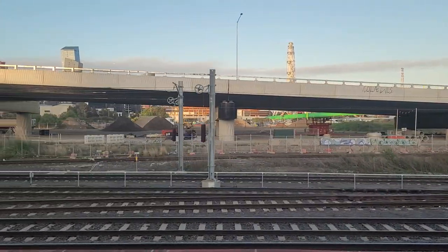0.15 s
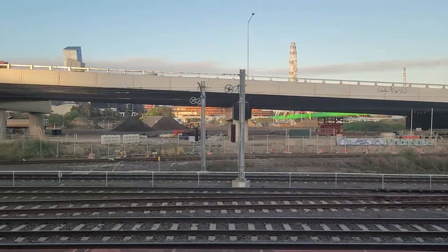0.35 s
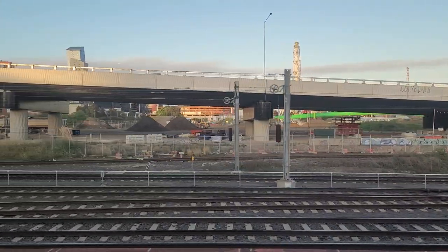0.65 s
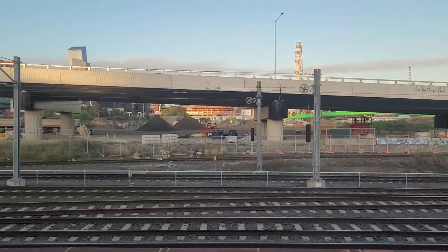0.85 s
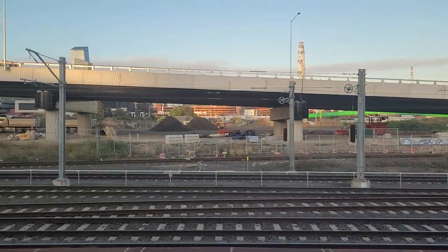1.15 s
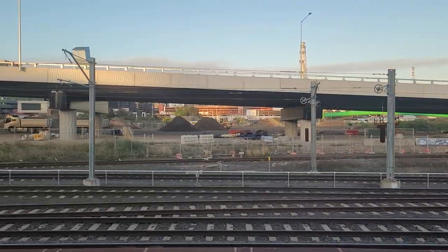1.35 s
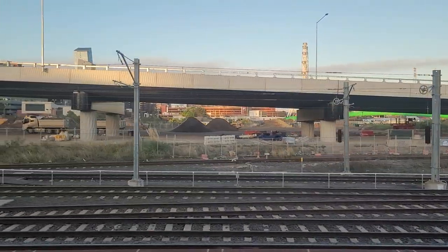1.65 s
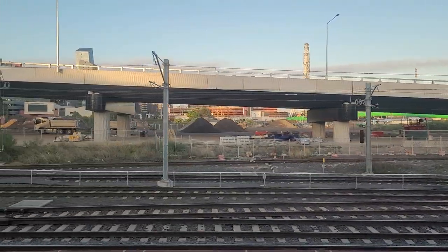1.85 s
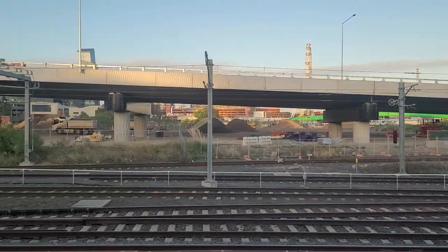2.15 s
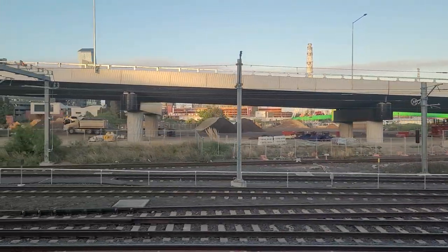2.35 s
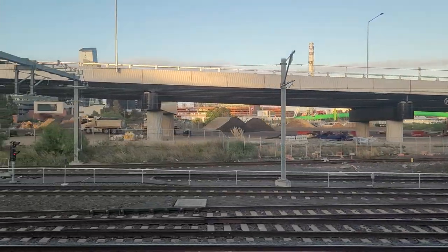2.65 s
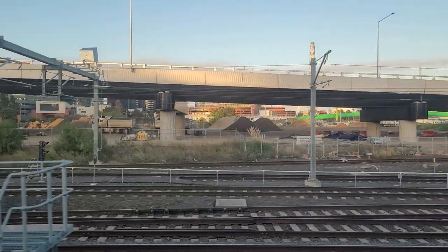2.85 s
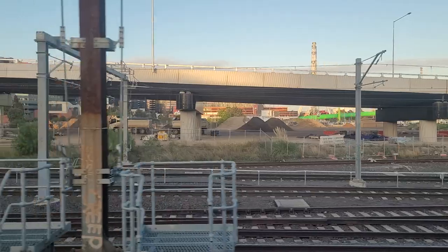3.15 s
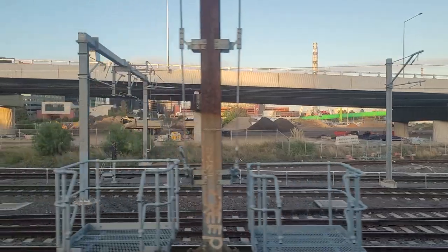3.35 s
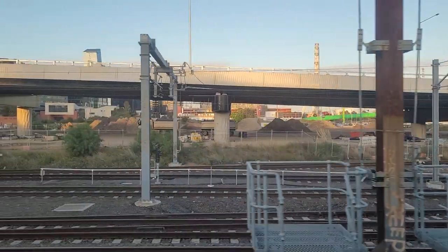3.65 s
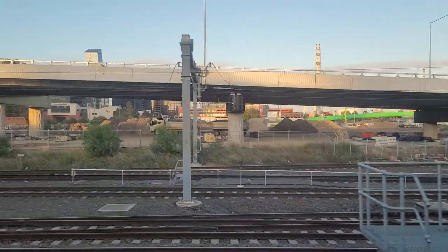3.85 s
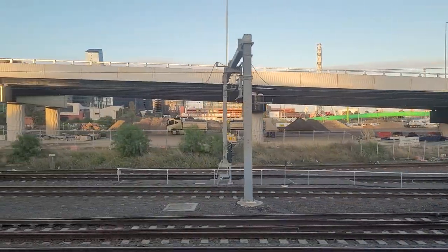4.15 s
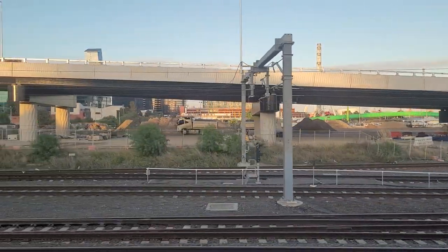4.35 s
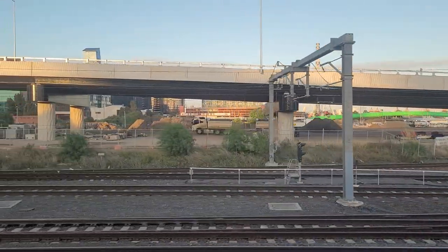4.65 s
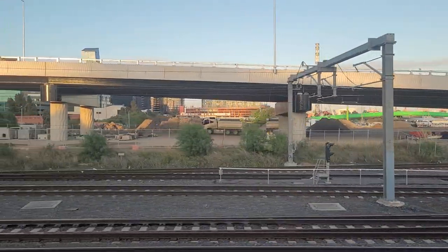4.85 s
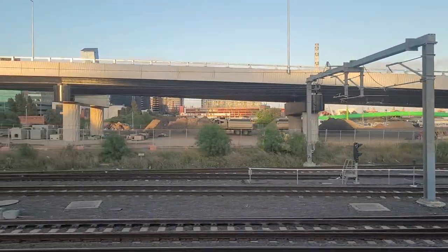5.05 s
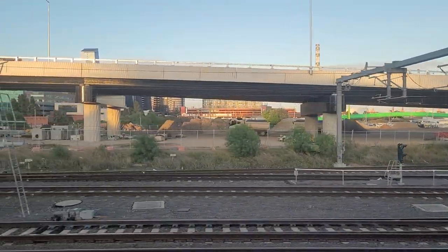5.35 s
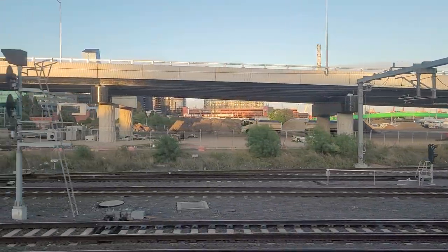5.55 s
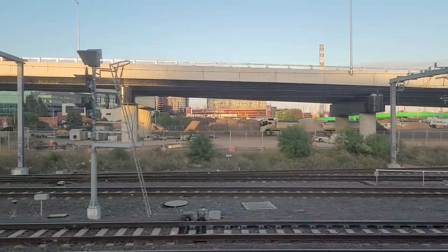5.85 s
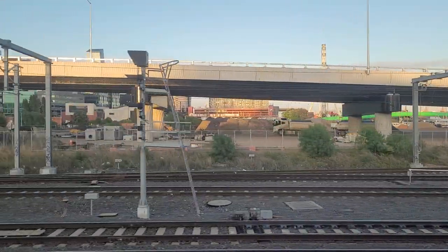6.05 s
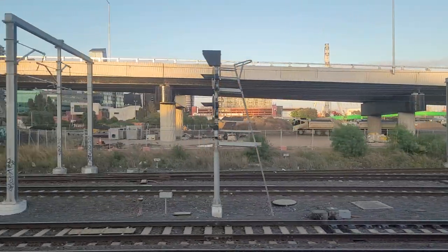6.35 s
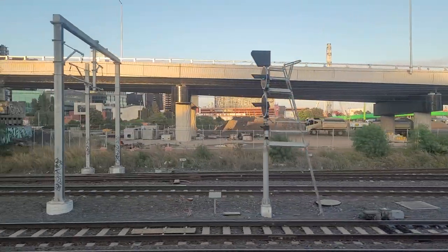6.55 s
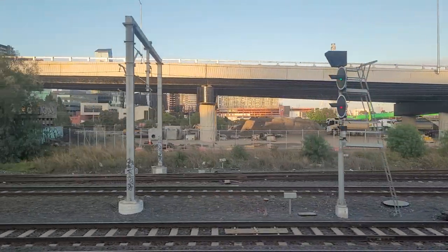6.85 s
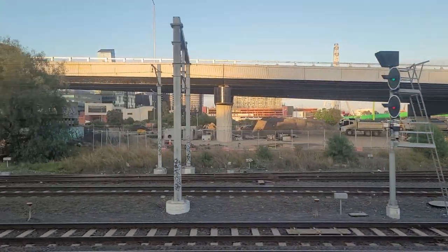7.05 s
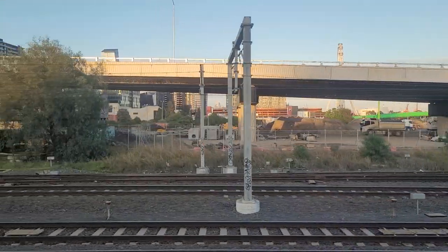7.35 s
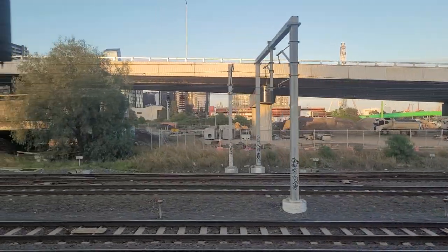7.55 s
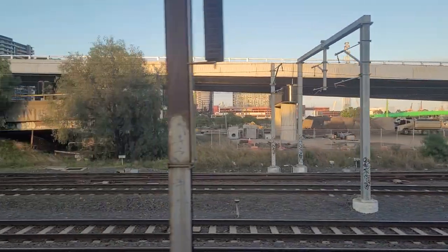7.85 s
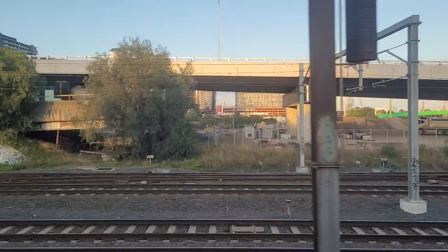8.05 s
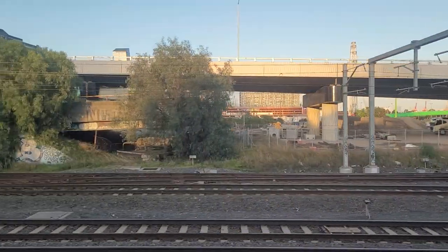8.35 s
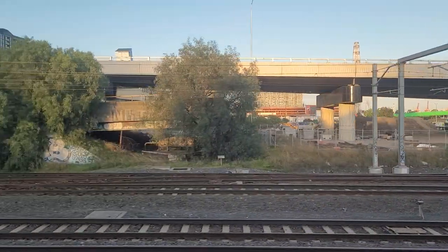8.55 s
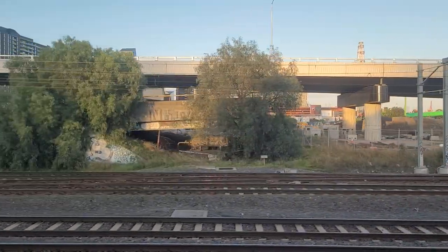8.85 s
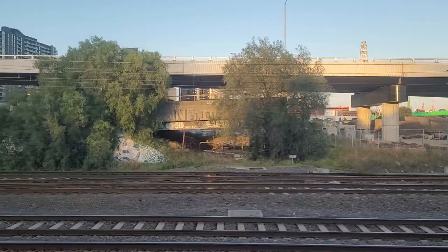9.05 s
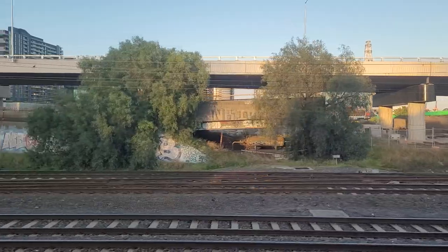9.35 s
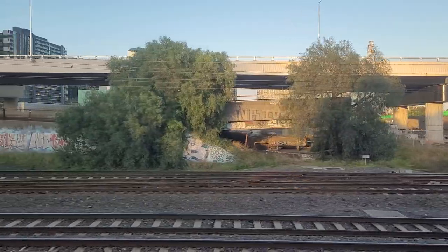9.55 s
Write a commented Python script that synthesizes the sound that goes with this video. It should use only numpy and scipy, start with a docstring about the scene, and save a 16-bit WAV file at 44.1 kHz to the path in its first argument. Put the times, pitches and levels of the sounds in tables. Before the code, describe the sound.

Steady train carriage rumble with faint whine and small ticks; late on, the track booms in surges and a catch snaps loudly to the left.

```python
"""Inside an electric train carriage rolling at an even speed: wheel and rail roughness excites the car body,
heard as a low drone and a roar under ventilation noise and a faint whine. The wheels thump over joints, and
a stretch of track, likely a short bridge, booms for about two seconds as its modes are driven in surges.
Fittings rebound in short ticks, a metal part clinks, a catch clacks on the left, and fabric swishes softly:
each is an impulse, decaying modes or shaped noise, and the hard contacts are followed by the cabin's echo."""
import sys
import numpy as np
from scipy import signal
from scipy.fft import rfft, irfft, next_fast_len
from scipy.io import wavfile
from scipy.ndimage import uniform_filter1d, map_coordinates

SR = 44100
rng = np.random.default_rng(int(sys.argv[2]) if len(sys.argv) > 2 else 0)


def materialize(psi):
    """Save the field psi as 16-bit PCM at rate SR to the path in sys.argv[1].

    A 1-D psi becomes a single channel; in a 2-D psi each row is a channel.
    """
    bounded = np.clip(np.atleast_2d(psi).T, -1, 1)
    quanta = np.round(bounded * 32767).astype(np.int16)
    wavfile.write(sys.argv[1], SR, quanta)


N = 427769  # length [samples]

# Roughness of the rails; its departure from the mean is used: (time [s], level [dB])
RAIL_ROUGHNESS = [(0.0, -54), (0.54, -53.5), (0.72, -51.5), (1.1, -52.3), (1.32, -50.5), (1.55, -51),
                  (3.3, -51.5), (3.9, -52), (6.7, -52), (7.3, -50.5), (8.05, -52), (8.73, -51.3),
                  (9.32, -53.5), (9.7, -52.5)]
# Low resonances of the car body: (frequency [Hz], width [Hz], relative level [dB])
FLOOR_MODES = [(30, 8, -9.5), (46.6, 12, -1), (63.8, 13, -0.5), (83.6, 5.8, -3), (109.4, 25.3, 1),
               (128.1, 17, -1), (166.5, 18, -2), (196.4, 70, -8.5)]
# Wall and window resonances: (frequency [Hz], width [Hz], relative level [dB])
PANEL_MODES = [(228.3, 18, -4.5), (260.3, 54, 0.5), (280, 61, -3), (319.4, 32, 0.5), (348.2, 28, -1.5),
               (400.5, 41, -5.5), (421, 48, -5), (444, 74, -18)]
# Spectrum of the rail roar: (frequency [Hz], relative density [dB per Hz])
ROAR_SPECTRUM = [(330, -40), (470, 2), (540, 0), (640, 0), (730, -2), (850, -7), (1000, -16.5),
                 (1300, -23.5), (2500, -65.5)]
# Each pair: level on average rail [dB], growth [dB per dB of roughness]
BOOM_DB, BOOM_GROWS = -31, 0.55  # floor
DRONE_DB, DRONE_GROWS = -34.5, 0.9  # panels
ROAR_DB, ROAR_GROWS = -42.5, 0.77  # rails, through the windows
AIR_DB, AIR_GROWS = -49, 1.1  # rush of air

# Bridge girders, through the floor: (frequency [Hz], width [Hz], relative level [dB])
GIRDER_MODES = [(66.2, 22, 2), (82, 47, -8.5), (103, 31, 0.5), (129.8, 13, 3.5), (166.8, 20, 1)]
# Bridge deck: (frequency [Hz], width [Hz], relative level [dB])
DECK_MODES = [(220, 52, -1), (249.2, 18, 1.5), (284, 28, 2), (323.7, 47, -2)]
# Upper resonances of the bridge: (frequency [Hz], width [Hz], relative level [dB])
UPPER_MODES = [(366, 37, 2), (367, 26, -9.5), (415, 66, 2), (440, 40, 1), (554, 109, -8.5),
               (1750, 400, -28.5)]
# Surges of the bridge: (time [s], girder relative level [dB], deck relative level [dB])
BRIDGE_SURGES = [(7.04, -25, -24), (7.11, -27.5, -32.5), (7.2, -23.5, -25), (7.27, -30, -24),
                 (7.41, -25.5, -27), (7.55, -25, -26), (7.65, -23.5, -21.5), (7.76, -24.5, -25),
                 (7.89, -22.5, -27), (7.99, -21.5, -22.5), (8.08, -20.5, -22.5), (8.18, -24.5, -24.5),
                 (8.37, -25, -26), (8.48, -19, -23), (8.6, -27.5, -29.5), (8.69, -24, -27.5),
                 (8.78, -26.5, -23), (8.92, -21, -23), (9.01, -26, -28), (9.09, -29, -27.5),
                 (9.16, -31, -22.5), (9.27, -40, -37.5)]
ENTER_S, LEAVE_S = 6.98, 9.33  # the car is on the bridge between these times
ENTER_RISE_S, LEAVE_FALL_S = 0.18, 0.052  # the bogie rolls on and off
GIRDER_DB = -0.44  # added to the girder surges
DECK_DB, DECK_ENDS_DB = -1.26, 1  # added to the deck surges: in mid-span, and the change at the ends
UPPER_DB, UPPER_ENDS_DB = -6.5, -7.5  # the same for the upper modes, which follow the deck
SPAN_ROAR_DB, SPAN_ROAR_FADE_DB = -43, -12.5  # extra roar: level at entry, and the change by the exit
STEADY_S = .08  # averaging time that evens out the girder and deck noise

# Wheels over joints:
# (time [s], knock relative level [dB], spectral tilt [dB per octave], floor push level [dB])
JOINT_BLOWS = [(0.722, -29.5, 2, -42), (0.756, -20, 0, -38), (0.794, -27, -6.5, -27),
               (0.831, -25.5, -8.5, -26), (1.655, -23, -9, -16.5), (1.705, -26.5, -14, -30),
               (1.958, -25.5, -4, -13.5), (3.182, -31.5, 4.5, -20), (3.515, -26, -13.5, -24.5),
               (3.812, -40, 7, -17.5), (6.910, -18.5, 1.5, -22), (6.936, -25.5, -1.5, -14),
               (9.120, -27, -2.5, -34), (9.56, -30, -2, -35)]
# Spectrum of a knock: (frequency [Hz], relative density [dB per Hz])
KNOCK_SPECTRUM = [(30, -26.5), (70, 2.5), (120, -2.5), (200, 0.5), (300, 7.5), (440, -4.5), (650, -10.5),
                  (950, -20), (1500, -36), (4000, -52), (10000, -76), (15000, -81.5)]
KNOCK_T60_S = 0.23  # every knock dies at the same speed

# Contacts of a hard catch as it snaps shut and settles: (time [s], level [dB])
CATCH_CONTACTS = [(9.0570, -15.5), (9.0775, -29.5), (9.129, -30)]
# Resonances of the catch: (frequency [Hz], width [Hz], relative level [dB])
CATCH_MODES = [(2080, 280, -2.5), (2700, 530, 1), (3320, 560, -0.5), (4400, 380, 1), (4900, 600, -5),
               (5960, 600, -5), (6900, 650, -10), (7850, 450, -9), (9200, 600, -14), (10100, 550, -16),
               (11400, 750, -19), (12350, 490, -15)]
# Modes of the panel that holds the catch: (frequency [Hz], relative level [dB])
CATCH_PANEL_MODES = [(1820, -2.5), (1980, -1), (2360, -1), (2850, -3.5), (4450, -7), (4910, -4.5)]
# Spectrum of the clack's echo: (frequency [Hz], relative density [dB per Hz])
CLACK_ECHO_SPECTRUM = [(1000, -27), (1800, 5.5), (2800, -0.5), (3800, -2.5), (4800, -2.5), (6500, -4),
                       (7700, -5.5), (9800, -4.5), (12400, -11.5), (14000, -23)]
CATCH_PANEL_T60_S = 0.097

# Cabin fittings:
# (time [s], relative level [dB], centre [Hz], width [octaves], echo level re unit-energy contact [dB])
FITTING_TICKS = [(0.634, -50.5, 3800, 0.8, 5), (0.691, -51.5, 4020, 0.89, 1.5), (2.174, -51, 4500, 1.1, -1),
                 (2.3228, -41, 3500, 0.71, -0.5), (3.548, -54.5, 5500, 0.55, 3),
                 (4.701, -47, 3500, 0.55, -1), (6.907, -60, 9400, .5, 9), (7.313, -54.5, 6000, 0.71, -0.5),
                 (7.384, -58, 6470, 0.55, 1.5), (7.824, -51, 7240, 0.62, -8)]
# Spectrum of a hard small contact: (frequency [Hz], relative density [dB per Hz])
SNAP_SPECTRUM = [(500, -32.5), (1450, -16), (1900, 2), (2400, 4), (3000, -1), (3800, -7), (4600, -4.5),
                 (5500, -6), (7700, -7.5), (12000, -8.5), (15000, -23.5)]
REBOUND_S, REBOUND_LOSS_DB = 0.012, 11.5  # a fitting chatters: time between contacts, loss at each
ECHO_DB, RING_DB = 2, -7  # echo of the faint ticks; energy of a tick's ring about its crack
FAINT_PER_S, FAINT_DB, FAINT_SPREAD_DB = .6, -63, 3  # rate, relative level and its spread either way
FAINT_HZ, FAINT_OCTAVES = 6000, 0.61  # middle of the centres, width of each

# Modes of a small metal part: (frequency [Hz], relative level [dB])
METAL_MODES = [(4820, -2), (5400, 2.5), (7120, -1.5), (7720, 0.5)]
METAL_T60_S, CLINK_S, CLINK_DB = .022, 7.9505, -46  # decay, time, relative level

# Fabric strokes:
# (centre time [s], swell deviation [s], level [dB], centre [Hz], width [octaves], left-right level [dB])
FABRIC_STROKES = [(1.461, 0.034, -59.5, 5400, 1, 1.5), (1.917, 0.086, -59.5, 9000, 1.7, 2),
                  (2.168, 0.11, -64, 5500, 1.9, 0.5), (2.821, 0.14, -65.5, 10750, 0.48, -10),
                  (5.354, 0.16, -71, 10700, .5, -1), (8.79, 0.063, -63, 6000, 1.8, 5.5)]
# Spectrum of sliding cloth: (frequency [Hz], relative density [dB per Hz])
CLOTH_SPECTRUM = [(1200, -32.5), (2500, 8), (4000, 4.5), (6500, 0), (9000, -2), (11400, -3), (11900, -9.5),
                  (15700, -8.5)]

# Lasting tones of the traction electronics: (frequency [Hz], mean level [dB])
WHINE_TONES = [(3030, -82), (2930, -86.5)]
# Passing hums: of gears and motors, and at 9.35 s the bridge deck ringing on:
# (centre time [s], swell deviation [s], frequency [Hz], peak level [dB])
PASSING_HUMS = [(1.59, 0.34, 459, -47), (2.688, 0.17, 467, -45), (4.99, 0.28, 490, -47),
                (5.311, 0.97, 715, -58), (5.803, 0.83, 434, -57.5), (6.595, 0.43, 440, -53),
                (9.352, 0.23, 207.2, -40.5)]

# Spectrum of the ventilation: (frequency [Hz], relative density [dB per Hz])
AIR_SPECTRUM = [(600, -34), (950, 1), (1300, 0.5), (1700, -4.5), (2300, -11), (3000, -13.5), (3400, -17),
                (4300, -19), (5200, -24), (7600, -30.5), (8700, -29.5), (10000, -30.5), (10700, -34),
                (15700, -32.5)]
WANDER_DB, AIR_WANDER_DB = 1.5, 1  # rms wander of narrow bands: in general, and in the air

# Likeness of the two ears in a diffuse field: (frequency [Hz], correlation [-1 to 1])
EAR_CORRELATION = [(40, .975), (180, .94), (300, .8), (430, .62), (490, .35), (720, .33), (930, -.3),
                   (1500, -.15), (2500, -.05), (6000, 0)]
# Left-right level difference of the field: (frequency [Hz], difference [dB])
EAR_LEVEL_DIFFERENCE = [(30, -2.5), (85, 0.5), (145, -2.5), (220, 0), (400, -3.5), (750, -1), (980, 2),
                        (1150, -6.5), (1600, -1.5), (2050, 0.5), (2800, 0.5), (4200, 2.5), (7000, -2.5),
                        (13000, 1.5)]
# Phase by which the left ear leads: (frequency [Hz], phase [rad])
EAR_PHASE_LEAD = [(45, .39), (110, .21), (200, .06), (430, .06), (510, .45), (600, 0), (780, .5),
                  (950, -.55), (1300, 0)]
# Reverberation of the cabin: (frequency [Hz], decay time T60 [s])
CABIN_T60 = [(200, .4), (2500, 0.38), (7000, 0.39), (13000, 0.2)]
# Treble shelf of the microphone: (frequency [Hz], gain [dB])
MIC_SHELF = [(7700, 0), (8300, -11)]
TOP_HZ = 15720  # band limit


def rolling(flutter_db=0.63, sway_db=-0.5):
    """Structure-borne sound: rail roughness shakes floor and panels; rail roar leaks through the windows."""
    rough = roughness()
    shake = flutter_db * wobble(15)
    boom_gain = amp(BOOM_DB + BOOM_GROWS * rough + sway_db * wobble(3.5))
    boom = boom_gain * field(resonances(FLOOR_MODES))
    drone = amp(DRONE_DB + DRONE_GROWS * rough + shake) * wandering(field(resonances(PANEL_MODES)))
    roar = amp(ROAR_DB + ROAR_GROWS * rough + shake) * wandering(field(colour(ROAR_SPECTRUM)))
    return boom + drone + roar


def roughness():
    """Roughness excitation: the rails under the car, in dB about their average."""
    db, = curves(RAIL_ROUGHNESS)
    return db - db.mean()


def bridge(judder_db=1):
    """Forced vibration: wheels drive girders and deck in juddering surges; upper modes peak in mid-span."""
    t = np.arange(N) / SR
    rolled_on = (t - ENTER_S) / ENTER_RISE_S
    still_on = (LEAVE_S - t) / LEAVE_FALL_S
    on_span = np.clip(np.minimum(rolled_on, still_on), 0, 1)
    crossed = np.clip((t - ENTER_S) / (LEAVE_S - ENTER_S), 0, 1)
    off_centre = (2 * crossed - 1) ** 2  # 0 in mid-span, 1 at the ends
    girder_db, deck_db = curves(BRIDGE_SURGES)
    girders = amp(girder_db + GIRDER_DB) * levelled(field(resonances(GIRDER_MODES)))
    deck_gain = amp(deck_db + DECK_DB + DECK_ENDS_DB * off_centre)
    deck = deck_gain * levelled(field(resonances(DECK_MODES)))
    upper_gain = amp(deck_db + UPPER_DB + UPPER_ENDS_DB * off_centre)
    upper = upper_gain * field(resonances(UPPER_MODES))
    roar_gain = amp(SPAN_ROAR_DB + SPAN_ROAR_FADE_DB * crossed)
    roar = roar_gain * wandering(field(colour(ROAR_SPECTRUM)))
    return on_span * amp(judder_db * wobble(18)) * (girders + deck + upper + roar)


def joints(rise=0.0065, knock_db=4, floor_hz=126, floor_t60=0.19):
    """Impact response: blows softened by the suspension swing the floor and ring crowded body modes."""
    out, t = np.zeros((2, N)), np.arange(SR // 2) / SR
    for s, db, tilt_db, push_db in JOINT_BLOWS:
        knock_gain = amp(db + knock_db - 60 * t / KNOCK_T60_S)
        knock = knock_gain * field(colour(KNOCK_SPECTRUM, tilt_db), len(t))
        push = amp(push_db - 60 * t / floor_t60) * np.sin(2 * np.pi * floor_hz * t)
        add(out, s, (1 - np.exp(-t / rise)) * (knock + push))
    return out


def clack(echo_db=1.5, lean_db=6, lag=.0001, wall_s=0.013, wall_db=-12, ring_db=-29):
    """Impact and reflection: a catch cracks on the left and rings its panel; a wall and the cabin answer."""
    out, t = np.zeros((2, N)), np.arange(SR // 5) / SR
    crack = impulse(resonances(CATCH_MODES))
    direct = sides(lean_db) * np.array([crack, np.roll(crack, round(lag * SR))])
    for s, db in CATCH_CONTACTS:
        ring = 0
        for hz, level in CATCH_PANEL_MODES:
            phase = rng.uniform(0, 2 * np.pi, (2, 1))
            ring = ring + amp(level) * np.sin(2 * np.pi * hz * t + phase)
        echo_click = impulse(colour(CLACK_ECHO_SPECTRUM))
        echo = signal.fftconvolve(echo_click[None], cabin_tail(), axes=1)
        add(out, s, amp(db) * direct)
        add(out, s, amp(db + ring_db - 60 * t / CATCH_PANEL_T60_S) * ring)
        add(out, s + wall_s, amp(db + wall_db) * np.array([crack, crack]))
        add(out, s, amp(db + echo_db) * echo)
    return out


def fittings(crack_db=16, ring_t60=0.026, left_db=4.0, lag=.0004, count=3):
    """Repeated impact: each contact cracks and rings, reaching the left ear first, then echoes."""
    out, t = np.zeros((2, N)), np.arange(SR // 30) / SR
    for s, db, centre, width, echo_db in FITTING_TICKS + faint_ticks():
        click = impulse(focused(SNAP_SPECTRUM, centre, width))
        for k in range(count):
            ring = rng.standard_normal((2, len(t))) * amp(-60 * t / ring_t60)
            direct = (t == 0) + amp(RING_DB) * ring / np.linalg.norm(ring[0])
            left = amp(left_db) * direct[0]
            right = amp(-left_db) * np.roll(direct[1], round(lag * SR))
            path = amp(echo_db) * cabin_tail()
            add(path, 0, np.array([left, right]))
            gain = amp(db + crack_db - k * REBOUND_LOSS_DB)
            add(out, s + k * REBOUND_S, gain * signal.fftconvolve(click[None], path, axes=1))
    return out


def faint_ticks():
    """Random excitation: rows like those of FITTING_TICKS for small fittings that stir at random."""
    rows = []
    for when, size, pitch in rng.uniform(0, 1, (round(FAINT_PER_S * N / SR), 3)):
        db = FAINT_DB + FAINT_SPREAD_DB * (2 * size - 1)
        centre = FAINT_HZ * 2 ** (pitch - .5)
        rows.append((when * N / SR, db, centre, FAINT_OCTAVES, ECHO_DB))
    return rows


def clink(rise=0.0017, scrape_db=0, scrape_hz=6200, scrape_octaves=0.28, echo_db=-9, lean_db=4):
    """Modal decay: light metal scrapes on metal close by and rings very briefly in a few high modes."""
    out, t = np.zeros((2, N)), np.arange(SR // 20) / SR
    modes = sum(amp(db) * np.sin(2 * np.pi * hz * t) for hz, db in METAL_MODES)
    scrape = amp(scrape_db) * field(focused(SNAP_SPECTRUM, scrape_hz, scrape_octaves), len(t))
    touch = (1 - np.exp(-t / rise)) * amp(-60 * t / METAL_T60_S) * (modes + scrape)
    add(out, CLINK_S, sides(lean_db) * touch)
    add(out, CLINK_S, amp(echo_db) * signal.fftconvolve(touch, cabin_tail(), axes=1))
    return amp(CLINK_DB) * out


def fabric(grain_db=1.5):
    """Sliding friction: cloth on cloth gives noise in soft, finely grained swells."""
    out, t = np.zeros((2, N)), np.arange(SR) / SR - .5
    for s, half, db, centre, width, lean_db in FABRIC_STROKES:
        rub = field(focused(CLOTH_SPECTRUM, centre, width), len(t))
        add(out, s - .5, amp(db) * sides(lean_db) * swell(t, half) * rub)
    return out * amp(grain_db * wobble(250))


def whine_and_hums(drift_hz=2.5, waver_db=3.5):
    """Tonal radiation: the drive whines thinly throughout, and hums of drive and bridge deck come and go."""
    t = np.arange(N) / SR
    whine = sum(amp(db + waver_db * wobble(1.4)) * tone(hz, drift_hz) for hz, db in WHINE_TONES)
    hums = sum(amp(db) * swell(t - s, half) * tone(hz, drift_hz) for s, half, hz, db in PASSING_HUMS)
    return whine + hums


def ventilation(flutter_db=0.5):
    """Flow noise: an air rush with a slight flutter; hiss from the rails swells it on rough track."""
    gain = amp(AIR_DB + AIR_GROWS * roughness() + flutter_db * wobble(9))
    return gain * wandering(field(colour(AIR_SPECTRUM)), AIR_WANDER_DB)


def cabin_tail():
    """Reverberation: stereo noise decaying by each band's T60, scaled to energy 1 in the left ear."""
    hz, t, z = signal.stft(rng.standard_normal((2, SR // 2)), SR, nperseg=256)
    decay = amp(-60 * t / along(CABIN_T60, hz)[:, None])
    tail = signal.istft(z * decay, SR, nperseg=256)[1]
    return tail / np.linalg.norm(tail[0])


def field(response, n=N):
    """Diffuse field: noise of rms 1 with interaural correlation, level and phase set by frequency."""
    def mid_side(hz):
        turn = np.arccos(np.clip(along(EAR_CORRELATION, hz), -1, 1)) / 2
        return response(hz) * [np.cos(turn), np.sin(turn)]

    def ears(hz):
        log_gain = along(EAR_LEVEL_DIFFERENCE, hz) * np.log(10) / 20
        difference = log_gain + 1j * along(EAR_PHASE_LEAD, hz)
        return np.exp(np.outer([1, -1], difference) / 2)  # half to each ear

    mid, side = filtered(rng.standard_normal((2, n)), mid_side)
    return unit(filtered(np.array([mid + side, mid - side]), ears))


def wandering(x, depth_db=WANDER_DB, size=4096):
    """Band modulation: narrow bands each swell and fade in their own time."""
    z = signal.stft(x, nperseg=size)[2]
    patches = uniform_filter1d(rng.standard_normal(z.shape[1:]), size=3, axis=0)  # over frequency
    patches = uniform_filter1d(patches, size=7, axis=1)  # over time
    return unit(signal.istft(z * amp(depth_db * unit(patches)), nperseg=size)[1][:, :N])


def levelled(x):
    """Level equalisation: noise held to an even loudness, so that only its drive makes it swell."""
    power = uniform_filter1d(np.mean(x ** 2, axis=0), round(STEADY_S * SR))
    return unit(x / np.sqrt(np.abs(power) + 1e-6))


def tone(hz, drift_hz):
    """Frequency modulation: an unsteady sine of rms 1 that reaches each ear at a different phase."""
    phase = 2 * np.pi * np.cumsum(hz + drift_hz * wobble(6)) / SR
    return unit(np.sin(phase + rng.uniform(0, np.pi / 2, (2, 1))))


def impulse(response, size=2048):
    """Minimum phase: the causal click of energy 1 that concentrates this response earliest."""
    cepstrum = irfft(np.log(response(np.fft.rfftfreq(size, 1 / SR)) + 1e-6))
    cepstrum[1:size // 2] *= 2  # fold the cepstrum to its causal half
    cepstrum[size // 2:] = 0
    click = irfft(np.exp(rfft(cepstrum)))
    return click / np.linalg.norm(click)


def resonances(modes):
    """Modal superposition: the response of steep-sided resonances that add in power."""
    def response(hz):
        power = 0
        for centre, width, db in modes:
            detuning = (hz * hz - centre * centre) / ((hz + 1) * width)
            power = power + (amp(db) / (1 + detuning ** 2)) ** 2
        return np.sqrt(power)
    return response


def colour(points, tilt_db=0):
    """Spectral shaping: the response of a spectrum, tilted by some dB per octave."""
    return lambda hz: amp(along(points, hz) + tilt_db * np.log2(hz / points[0][0] + 1))


def focused(points, centre, width):
    """Band limiting: the response of a spectrum, narrowed to some octaves about a centre."""
    return lambda hz: colour(points)(hz) / (1 + (np.log2((hz + 1) / centre) / width) ** 2)


def filtered(x, response):
    """Linear filtering: x times a response of frequency, padded against wrap-around."""
    n = x.shape[-1]
    m = next_fast_len(n + SR // 8)
    return irfft(rfft(x, m) * response(np.fft.rfftfreq(m, 1 / SR)), m)[..., :n]


def swell(t, half):
    """Gaussian envelope: a bell-shaped rise and fall about t = 0."""
    return np.exp(-(t / half) ** 2 / 2)


def wobble(rate):
    """Random modulation: a smooth curve through random knots, rate of them a second."""
    knots = rng.standard_normal(int(N * rate / SR) + 4)
    return map_coordinates(knots, [np.arange(N) * rate / SR])


def sides(lean_db):
    """Interaural level difference: gains of the left and right ear."""
    return amp([[lean_db / 2], [-lean_db / 2]])


def along(points, hz):
    """Logarithmic pitch scale: (frequency, value) points read on a log axis."""
    f, v = np.transpose(points)
    return np.interp(np.log(hz + 1), np.log(f + 1), v)


def curves(rows):
    """Linear interpolation: one value per sample for each column after the time."""
    s, *cols = np.transpose(rows)
    return [np.interp(np.arange(N) / SR, s, c) for c in cols]


def add(track, s, sound):
    """Superposition: mix a stereo sound into the track at time s."""
    part = track[:, max(0, round(s * SR)):][:, :sound.shape[1]]
    part += sound[:, :part.shape[1]]


def amp(db):
    """Level scale: decibels to gain."""
    return 10 ** (np.asarray(db) / 20)


def unit(x):
    """Normalisation: scale to rms 1."""
    return x / np.sqrt(np.mean(x ** 2) + 1e-20)


def scene():
    """Superposition of every source heard from a window seat."""
    train = rolling() + bridge() + joints()
    cabin = clack() + fittings() + clink() + fabric()
    return train + cabin + whine_and_hums() + ventilation()


def record(dry):
    """Transducer response: the microphone dulls the top treble and keeps nothing above its band limit."""
    return filtered(dry, lambda hz: amp(along(MIC_SHELF, hz)) * (hz < TOP_HZ))


dry = scene()
out = record(dry)
materialize(out)
```